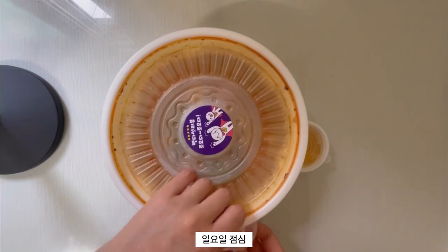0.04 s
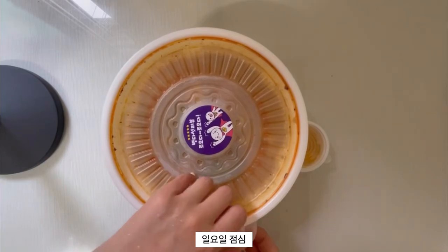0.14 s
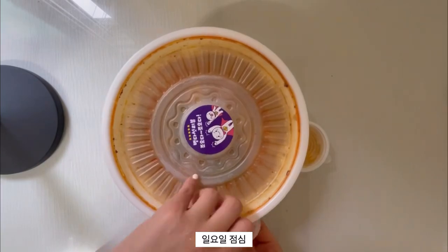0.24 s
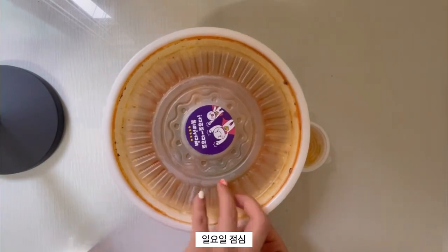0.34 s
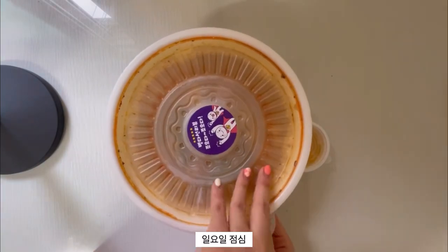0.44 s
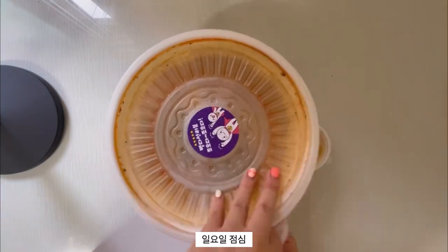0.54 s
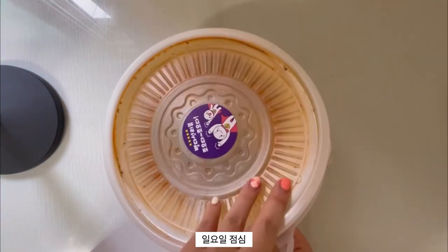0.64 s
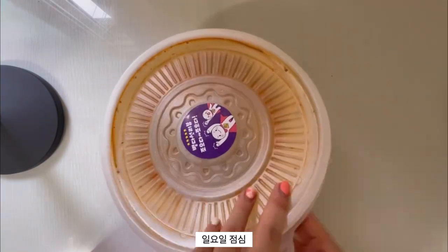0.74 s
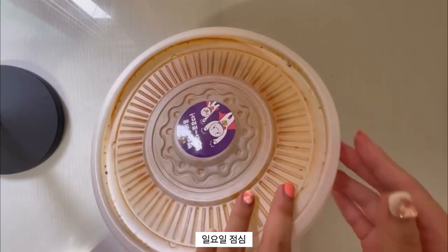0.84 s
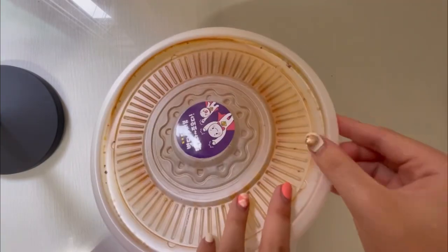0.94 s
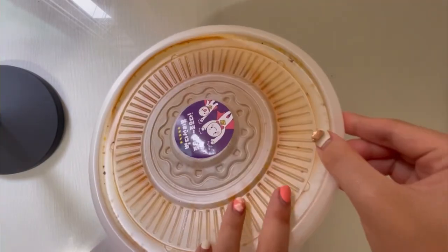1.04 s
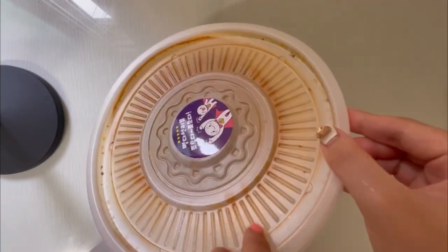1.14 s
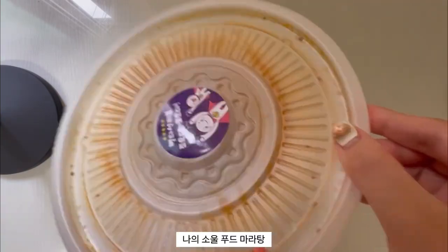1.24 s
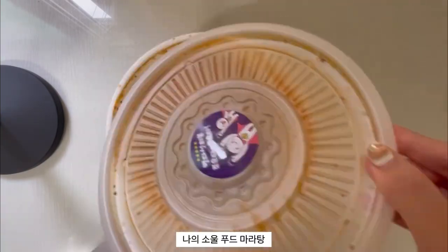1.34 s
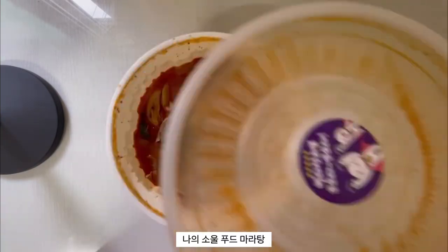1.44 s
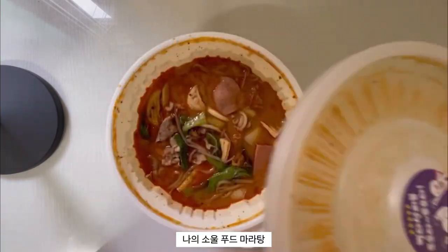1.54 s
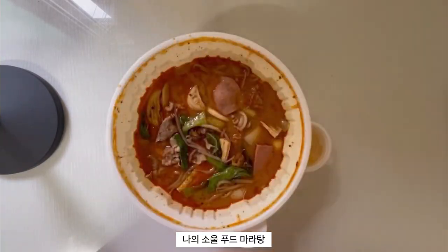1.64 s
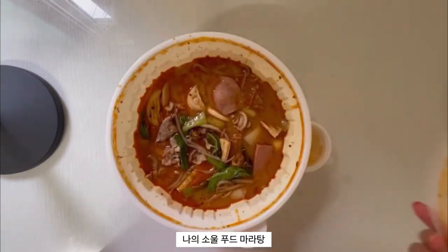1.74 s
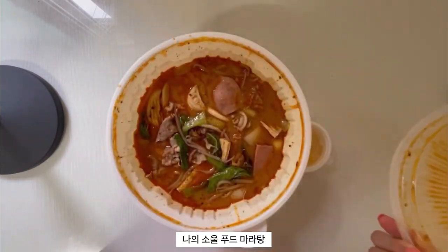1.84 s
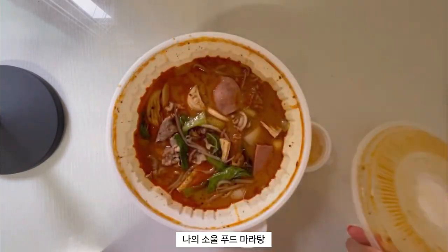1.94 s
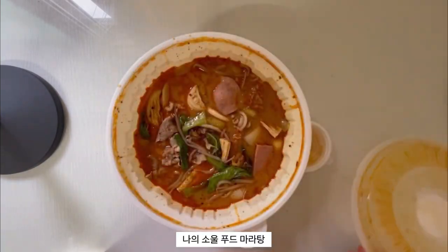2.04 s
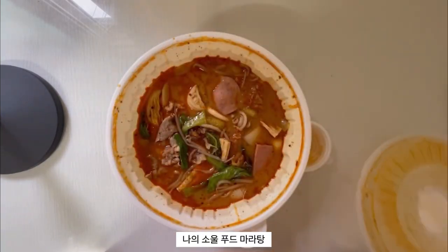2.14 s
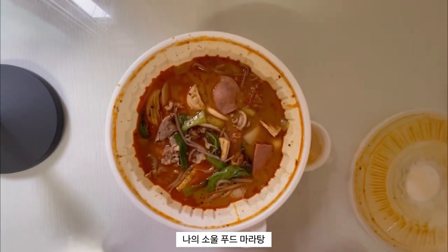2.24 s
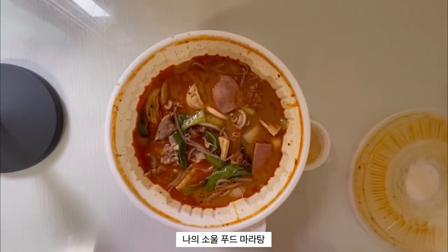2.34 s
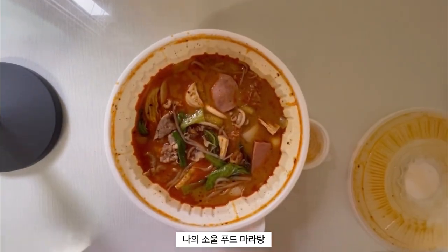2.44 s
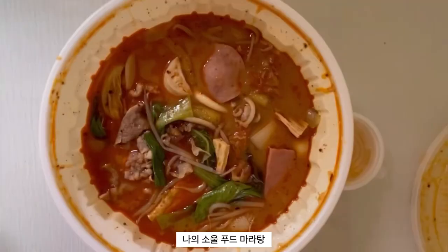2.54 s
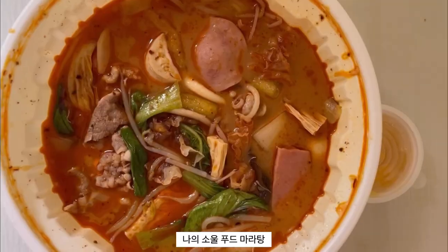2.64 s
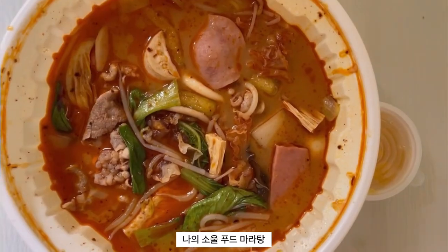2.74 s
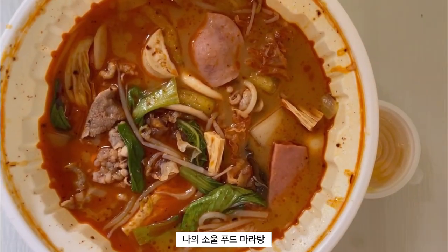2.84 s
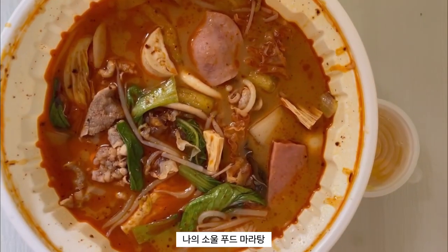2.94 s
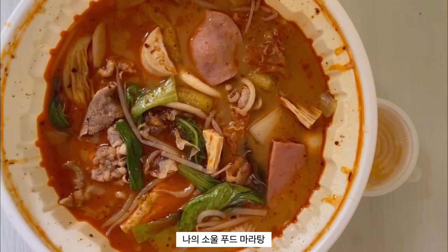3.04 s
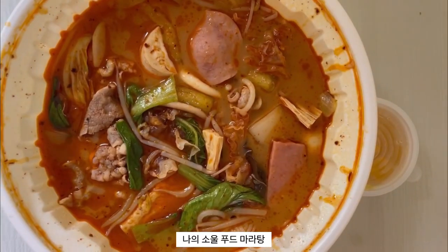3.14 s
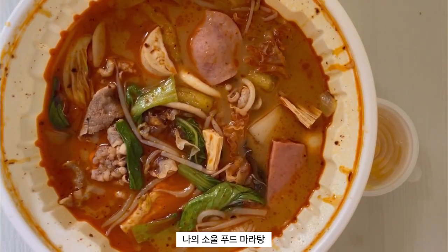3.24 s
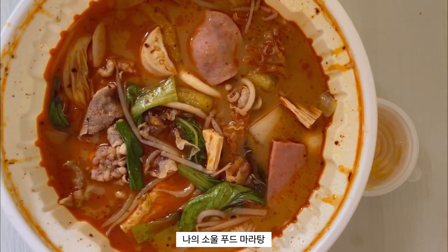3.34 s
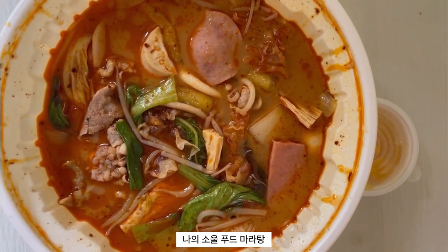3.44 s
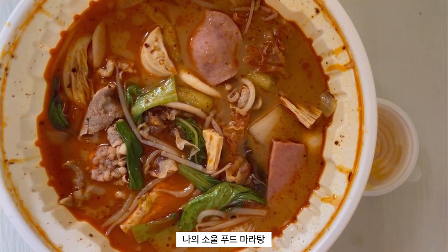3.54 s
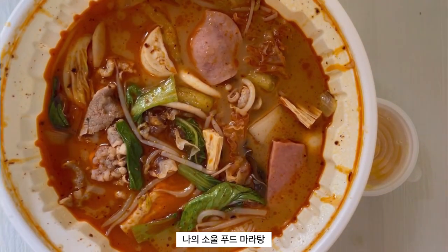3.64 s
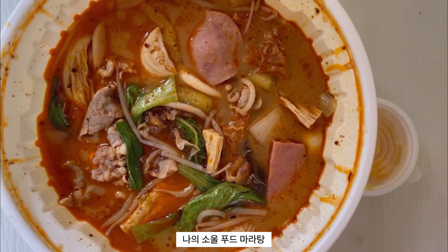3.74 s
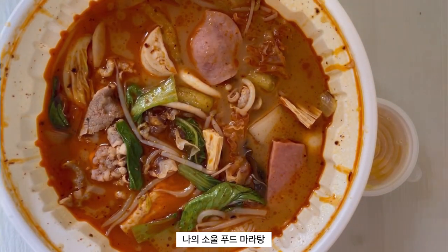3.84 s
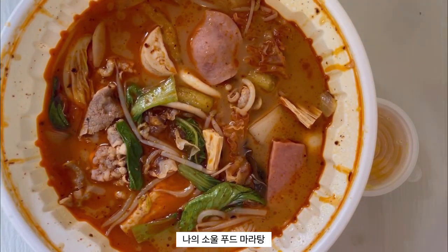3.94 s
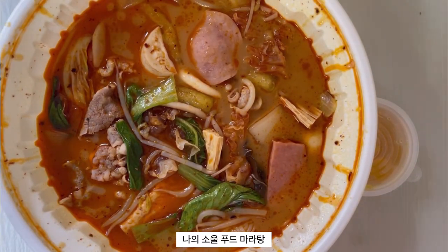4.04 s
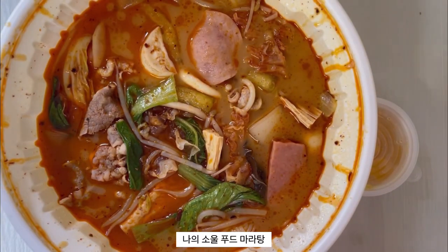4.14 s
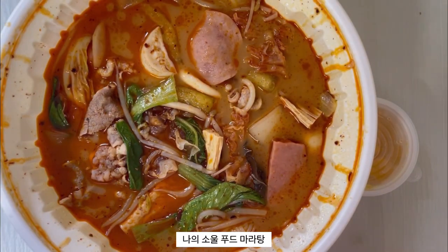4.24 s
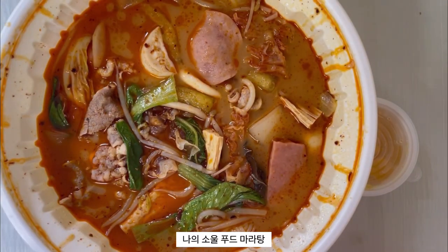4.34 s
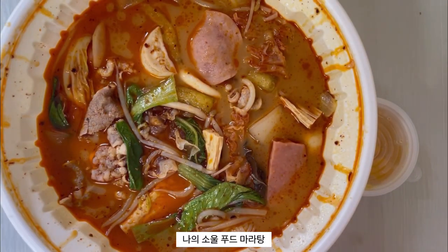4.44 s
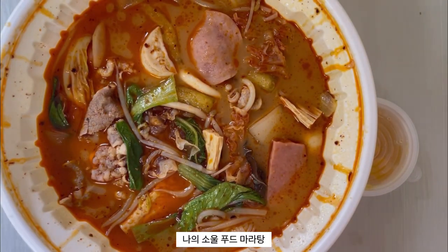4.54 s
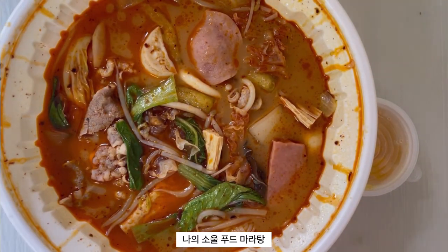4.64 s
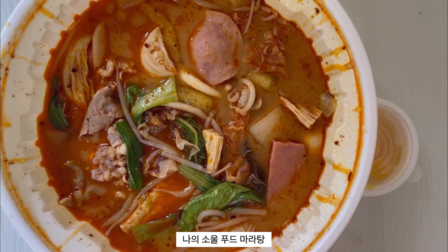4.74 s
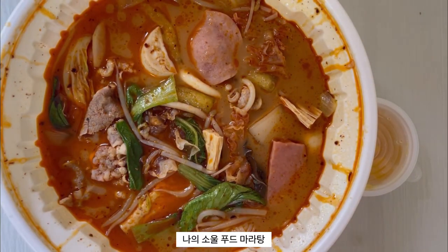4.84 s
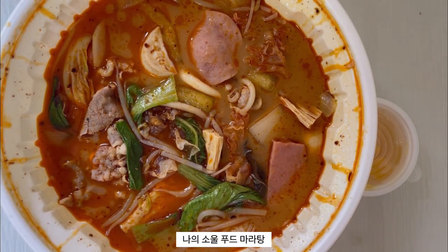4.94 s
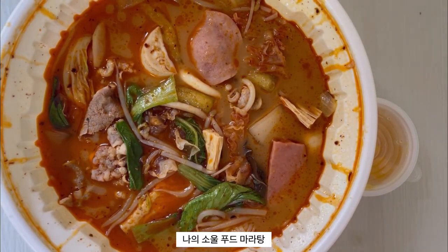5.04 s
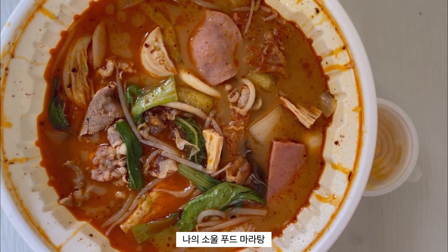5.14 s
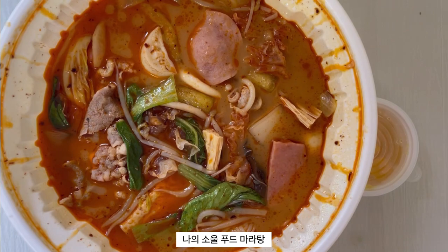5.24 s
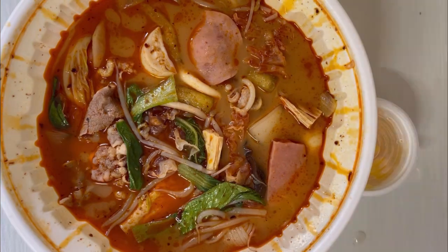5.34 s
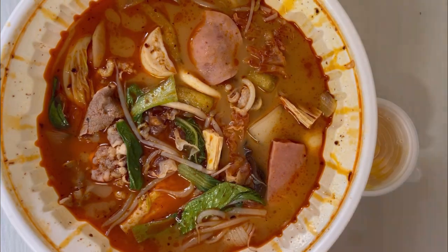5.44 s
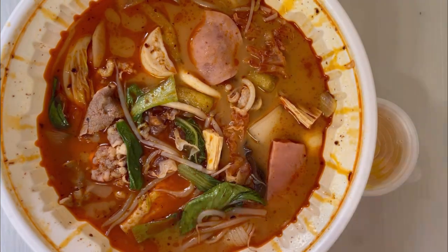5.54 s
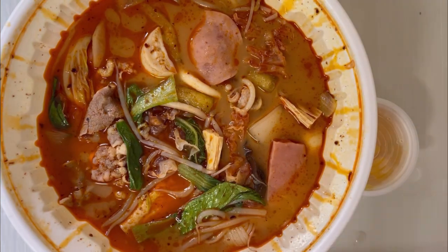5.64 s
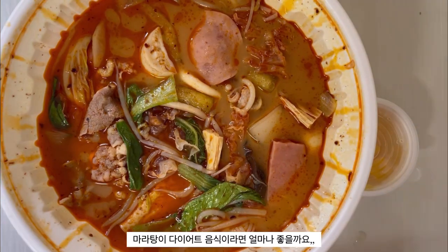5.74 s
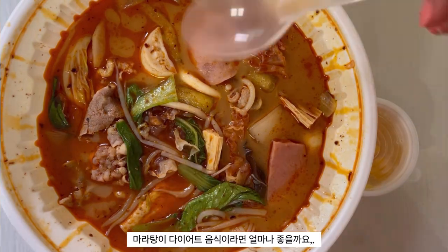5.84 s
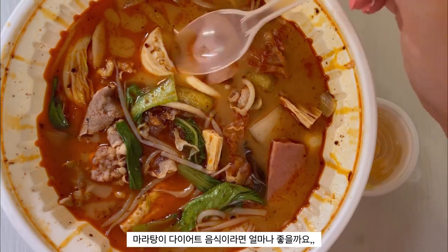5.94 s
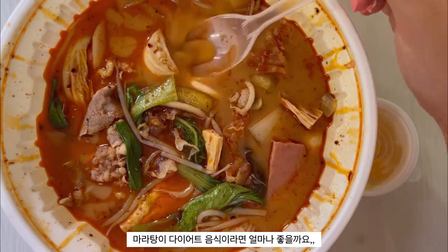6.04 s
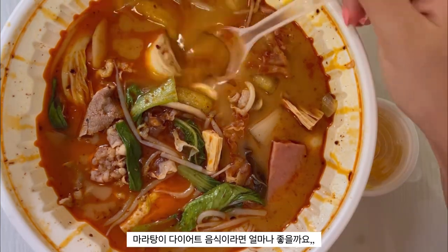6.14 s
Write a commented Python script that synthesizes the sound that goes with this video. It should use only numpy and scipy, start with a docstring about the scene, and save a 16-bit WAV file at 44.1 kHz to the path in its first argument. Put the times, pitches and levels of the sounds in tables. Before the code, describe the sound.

A thin plastic lid is squeaked, snapped and ratcheted off a tub, then clatters onto a table in a small humming room.

```python
"""In a small quiet room, close to the microphones, a thin plastic lid is pried off a soup tub on a table.
The rim ticks, squeaks, lets go and unzips: filtered clicks and stick-slip pulses ring a thin sheet.
The freed lid pops (short ringing modes) and is laid down with a clatter of clicks.
Plastic things are tapped and fingered, a sleeve rustles (shaped noise) and a spoon clicks.
An appliance hums throughout as wavering sines over shaped noise."""
import sys
import numpy as np
from scipy import signal
from scipy.fft import rfft, irfft
from scipy.io import wavfile
from scipy.ndimage import uniform_filter1d

SR = 44100
rng = np.random.default_rng(int(sys.argv[2]) if len(sys.argv) > 2 else 0)


def pcm_store(signal):
    """Save signal as 16-bit PCM."""
    levels = np.round(np.clip(np.atleast_2d(signal), -1, 1) * 32767)
    wavfile.write(sys.argv[1], SR, levels.astype(np.int16).T)


N = 272538
SIZE = 4096  # samples in a click
HZ, AGE = np.fft.rfftfreq(SIZE, 1 / SR), np.arange(SIZE) / SR
RELEASE_S = 0.5  # until the seal lets go the rim is taut

# Colours are relative; some sources add their own gain to the levels in their tables.
# single snaps as the rim slips over the lip of the tub: [t/s, level/dB, relative lift of the lows/dB]
RIM_SNAPS = [(0.0274, -35, -19.5), (0.0397, -32, -30), (0.0601, -24.5, -2.5), (0.0635, -31.5, 6),
             (0.0885, -39.5, 4), (0.1038, -36.5, -33), (0.136, -45.5, 4), (0.25, -44.5, -10.5),
             (0.2587, -39, -5), (0.2759, -36.5, 0), (0.2921, -30, -9), (0.2976, -34, 9),
             (0.3096, -31.5, -2.5), (0.339, -36, 10), (0.395, -35, 4.5), (0.423, -26.5, 2.5),
             (0.5198, -16, -25), (0.588, -31.5, 15), (0.6042, -34.5, 16.5), (0.6163, -28, 10),
             (0.6214, -27.5, 9.5), (0.6298, -27, 7), (0.631, -28.5, -11), (0.642, -32, 13),
             (0.652, -30, -3), (0.656, -30.5, 10), (0.6705, -26, 4.5), (0.721, -27, 5), (0.747, -30.5, 11),
             (0.7677, -23.5, -19), (0.7761, -19.5, -2), (0.803, -20, 2), (0.8255, -27.5, 4),
             (0.834, -32, 10), (0.8472, -27, 7.5), (0.904, -41, 1)]
# colour of the sleeve, and of a hand bump before its modes: [f/Hz, density/dB per Hz]
SLEEVE = [(53, -67), (90, -9.5), (155, 4.5), (210, 0), (488, 0), (593, -2), (977, -4), (1290, -8.5),
          (2040, -13), (3430, -21), (5530, -25.5), (16000, -36)]


def gain_of(db):
    """Decibels to amplitude."""
    return 10 ** (np.asarray(db) / 20)


def evened(x):
    """Scales to rms 1."""
    return x / np.sqrt(np.mean(x ** 2) + 1e-20)


def unit(x):
    """Scales to a mean energy of 1 a channel."""
    return evened(x) / np.sqrt(x.shape[-1])


def steadied(x, size):
    """Holds the short-time rms near 1."""
    return x / np.sqrt(abs(uniform_filter1d((x ** 2).mean(0), size)) + 1e-12)


def low_cut(x, hz, order):
    """Takes out what lies below hz."""
    return signal.sosfilt(signal.butter(order, hz, "high", fs=SR, output="sos"), x)


def read(points, hz):
    """Reads a spectrum on a log-frequency axis."""
    f, value = np.transpose(points)
    return np.interp(np.log(hz + 1), np.log(f + 1), value)


def level(rows):
    """A dB curve as a gain over the whole scene, fading quickly to silence outside its span."""
    s, db = np.transpose(rows)[:2]
    curve_db = np.interp(np.arange(N) / SR, s, db, left=-200, right=-200)
    return uniform_filter1d(gain_of(curve_db), size=130)


def strokes(rows):
    """The gain of a set of strokes: each swells to its peak and fades, evenly in dB."""
    t = np.arange(N) / SR
    depth_db = 16.5  # the change over one rise time or one fall time
    gains = []
    for s, db, rise, fall in rows:
        away = np.maximum((s - t) / rise, (t - s) / fall)
        gains.append(gain_of(db - depth_db * np.minimum(away, 10)))
    return np.linalg.norm(gains, axis=0)


def add(mix, s, sound):
    """Mixes a stereo sound in at time s."""
    part = mix[:, max(round(s * SR), 0):][:, :sound.shape[1]]
    part += sound[:, :part.shape[1]]


def resonances(modes, hz=HZ):
    """Peaks, and dips where the lift is negative, in dB."""
    return sum(db / (1 + (2 * (hz - f) / width) ** 2) for f, width, db in modes)


def body(colour, modes=(), hz=HZ):
    """A broad colour with resonances on top, in dB."""
    return read(colour, hz) + resonances(modes, hz)


def close_modes(depth_db, size):
    """The many close modes of a thin sheet, as a random ripple in dB."""
    ripple = uniform_filter1d(rng.standard_normal(len(HZ)), size=size)
    return depth_db * evened(uniform_filter1d(ripple, size=size))


def causal(db):
    """The minimum-phase response of a dB shape: it rings only after the blow."""
    log_gain = np.log(gain_of(np.maximum(db, db.max() - 100)))
    mirrored = np.r_[log_gain, log_gain[-2:0:-1]]
    return np.exp(np.conj(signal.hilbert(mirrored)))[:len(db)]


def bending(delay_s):
    """Bending waves in a thin sheet: treble arrives first, the lows lag; delay_s sets the spread."""
    delay = delay_s * np.sqrt(1300 / (HZ + 300))
    return np.exp(-2j * np.pi * np.cumsum(delay - delay.min()) * HZ[1])


def pair(apart, size, spacing_hz=1000, shadow_hz=7000, shadow=0.86):
    """Noise for two close microphones: the bass is shared, and the casing shadows the top treble."""
    shared, side = rng.standard_normal((2, size))
    side = low_cut(side, spacing_hz, order=1) + shadow * low_cut(side, shadow_hz, order=1)
    return shared + apart * np.array([side, -side])


def through(x, response):
    """Filters each channel."""
    return signal.oaconvolve(x, irfft(response)[None], axes=1)[:, :N]


def clicks(rows, shape_db, gain_db, bend_s, scuff, scuff_s, ring_db, ring_t60, apart, pan_db,
           strain=0, scuff_hz=0):
    """Each click is a sharp release, a brief scuff and a ring, spread by the sheet, coloured by its spot."""
    out = np.zeros((2, N))
    lows = read([(1300, 0.94), (2000, 0.027)], HZ)
    highs = read([(4000, 0.098), (9000, 1)], HZ)
    middle = (HZ > 1800) & (HZ < 5000)  # the level of a click is set in this band
    damping_db = -4.5 * highs  # plastic damps its treble at once, so the ring is duller than the blow
    grit = HZ / np.hypot(HZ + 1, scuff_hz)  # below scuff_hz the release is one clean push
    fade = np.minimum(1, 10 * (1 - AGE / AGE[-1])) ** 2
    pan = np.array([[pan_db], [-pan_db]]) / 2  # positive leans left
    shapes = np.broadcast_to(shape_db, (len(rows), len(HZ)))  # one for all, or one each
    for (s, db, low_db, high_db, *_), shape in zip(rows, shapes):
        rasp = unit(pair(apart, SIZE) * np.sqrt(AGE) * np.exp(-AGE / scuff_s))
        force = np.sqrt(1 + scuff ** 2 * (1 - grit ** 2)) + scuff * grit * rfft(rasp)
        ring = unit(pair(apart, SIZE) * gain_of(-60 * AGE / ring_t60))
        drive = force + gain_of(ring_db + damping_db) * rfft(ring)
        # bending the sheet shifts its resonances, and every spot has its own path to the edge
        bent_db = np.interp(HZ * (1 + strain * rng.uniform(-1.4, 1)), HZ, shape)
        response = causal(bent_db + .8 * low_db * lows + high_db * highs)
        z = drive * response * bending(bend_s * rng.uniform(.5, 1))
        click = fade * irfft(z) / np.linalg.norm(irfft(z * middle).mean(0))
        add(out, s, click * gain_of(gain_db + db + pan))
    return out


def crackle(envelope, shape_db, gain_db, per_s, size_db, bend_s, apart):
    """A dense train of tiny slips of random size and sign into the sheet."""
    slips = (rng.random(N) < per_s / SR) * rng.choice([-1, 1], N)
    slips = slips * gain_of(size_db * rng.standard_normal(N))
    side = apart * low_cut(slips * rng.standard_normal(N), 1200, order=1)
    sound = through(np.array([slips + side, slips - side]), causal(shape_db) * bending(bend_s))
    return gain_of(gain_db) * steadied(sound, size=1100) * envelope


def rub(colour, grain_db, grain_size, apart):
    """Friction noise of rms 1 that comes in small clumps."""
    clumps = gain_of(grain_db * evened(uniform_filter1d(rng.standard_normal(N), size=grain_size)))
    return evened(through(pair(apart, N) * clumps, causal(body(colour))))


def room_tone(waver=1.0):
    """Fan-like air with a low drone, and appliance hum lines whose phases waver a little."""
    # colour of the air: [f/Hz, density/dB per Hz]
    air_colour = [(18, -87.5), (30, -60), (103, -28.5), (124, -15), (174, -5.5), (204, -15), (426, -15),
                  (461, -26), (512, -9.5), (569, -19.5), (702, -13.5), (913, -24.5), (1130, -28),
                  (2230, -34.5), (16000, -56.5)]
    # resonances in the air: [f/Hz, width/Hz, lift/dB]
    air_modes = [(142.9, 30, 11), (730, 460, 1.94), (2756, 300, 2.5), (5000, 110, 8.6)]
    # likeness of left and right: [f/Hz, likeness 0-1]
    air_same = [(60, 0.97), (180, 1), (550, 0.85), (1650, 0.031), (4970, 0.29), (15000, 0.02)]
    # appliance hum: [f/Hz, rms level/dB]
    hum_lines = [(177.6, -62.5), (285.3, -76.5), (527.6, -79.5), (699.8, -75), (893.6, -79)]
    air_db = -62.5  # rms of both channels above 200 Hz sets the reference
    hz, t = np.fft.rfftfreq(N, 1 / SR), np.arange(N) / SR
    a, b = rfft(rng.standard_normal((2, N)))
    same = np.clip(read(air_same, hz), 0, 1)
    z = np.array([a, same * a + np.sqrt(1 - same ** 2) * b]) * gain_of(body(air_colour, air_modes, hz))
    out = gain_of(air_db) * irfft(z, N) / np.std(irfft(z * (hz > 200), N))
    knots = np.linspace(0, t[-1], num=40)
    for f, db in hum_lines:
        drift = waver * np.interp(t, knots, rng.standard_normal(len(knots)))
        out += gain_of(db) * np.sqrt(2) * np.sin(2 * np.pi * (f * t + rng.random()) + drift)
    return out


def rim_creep(seated):
    """The seated rim creeps under the fingers as a dense crackle of tiny slips."""
    # swells of the creeping: [peak t/s, level/dB, rise/s, fall/s]
    creep = [(0.055, -44.5, 0.043, 0.02), (0.105, -49, 0.021, 0.12), (0.246, -46.5, 0.015, .05),
             (0.295, -40.5, 0.038, 0.046)]
    # creeping has thinner upper mids and a little more top treble than snapping: [f/Hz, lift/dB]
    tilt = [(1000, -2), (4000, -4.5), (12000, 2)]
    return crackle(strokes(creep), seated + read(tilt, HZ), gain_db=-1.5, per_s=3300, size_db=3.0,
                   bend_s=0.0017, apart=0.56)


def taut_snaps(seated):
    """While the rim is clamped on the tub it snaps sharply and brightly, its lightest ticks most of all."""
    middling_db, high_lift_db = -34.5, 10.5
    brightening = .6  # extra dB of highs for each dB under a middling snap
    snaps = [(s, db, low_db, high_lift_db + brightening * (middling_db - db))
             for s, db, low_db in RIM_SNAPS if s < RELEASE_S]
    return clicks(snaps, seated, gain_db=17.0, bend_s=0.0012, scuff=1.0, scuff_s=0.0018, ring_db=-5.5,
                  ring_t60=0.05, apart=0.45, pan_db=2.0, strain=0.03)


def thumps(rise_s=0.0016, lowest_hz=125):
    """Each flex swells in a moment and dies as one ringing mode, mostly low.

    A low cut like the recorder's keeps out the deep bass."""
    # a wall flexes and rings hollow: [t/s, level/dB before swell and low cut, f/Hz, t60/s]
    flexes = [(0.061, -24.5, 666, 0.025), (0.293, -30.5, 853, 0.086), (0.527, -13.5, 593, .025),
              (0.531, -21, 998, 0.11), (0.534, -27, 2343, .12), (0.806, -31.5, 1049, 0.13),
              (1.237, -13.5, 182, 0.037), (1.236, -30.5, 388, 0.038), (1.970, -34.5, 433.6, 0.1),
              (2.196, -25.5, 610, 0.025), (2.226, -35, 420.6, 0.14), (4.224, -37.5, 700, 0.21),
              (4.2239, -28.5, 427, 0.043), (4.443, -32.5, 1074, 0.073), (5.494, -33, 470, 0.043),
              (5.514, -38, 151, 0.15), (5.574, -36, 383, .045)]
    out, t = np.zeros((2, N)), np.arange(SR // 2) / SR
    for s, db, hz, t60 in flexes:
        ring = gain_of(db - 60 * t / t60) * (1 - np.exp(-t / rise_s)) * np.sin(2 * np.pi * hz * t)
        add(out, s, np.array([ring, ring]))
    return low_cut(out, lowest_hz, order=4)


def squeaks(scuff=.9, apart=.17, jitter=.05):
    """Nearly regular stick-slip pulses, each with its own scuff, ring the rim and race as it lets go."""
    # the rim sticks and slips, one table a squeak: [t/s, level/dB, mean slips a second]
    squeak_tables = [
        [(0.448, -43, 500), (0.451, -42, 360), (0.463, -40, 1040), (0.471, -43.5, 810)],
        [(0.486, -41.5, 635), (0.497, -32, 750), (0.506, -24.5, 580), (0.512, -22, 520), (0.519, -21.5, 680),
         (0.5217, -14, 1820), (0.524, -25, 2400)],
    ]
    # colour of the squeaking rim: [f/Hz, density/dB per Hz]
    squeal = [(240, -66), (400, -38.5), (504, -21), (801, -23), (1070, -4), (1290, -17.5), (1530, -7.5),
              (2800, -9), (3260, -4.5), (5960, -13.5), (7750, -13.5), (11900, -34), (16000, -45)]
    response = causal(body(squeal, [(3580, 550, 5.2), (1000, 140, 4.8)]))
    out, t = np.zeros((2, N)), np.arange(N) / SR
    for rows in squeak_tables:
        s, _, rate = np.transpose(rows)
        uneven = 1 + jitter * evened(uniform_filter1d(rng.standard_normal(N), size=80))
        turns = np.cumsum(np.interp(t, s, rate) * uneven) / SR
        pulses = evened(np.diff(np.floor(turns), prepend=0))
        force = pulses + scuff * evened(pair(apart, N) * np.exp(-(turns % 1) / 0.39))
        out += level(rows) * steadied(through(force, response), size=170)
    return out


def loose_snaps(rim):
    """Once the seal has let go the snaps are duller."""
    snaps = [(s, db, low_db, -0.5) for s, db, low_db in RIM_SNAPS if s >= RELEASE_S]
    return clicks(snaps, rim, gain_db=17.0, bend_s=0.004, scuff=1.3, scuff_s=0.0012, ring_db=-5.5,
                  ring_t60=0.038, apart=0.35, pan_db=2.5, strain=0.022, scuff_hz=2200)


def unzipping(rim, count=8, unevenness=0.53, spread_db=3.5, high_db=-2):
    """The rim unzips along the lip: each run is a handful of slips, uneven in time and size."""
    # one row a run: [start t/s, end t/s, level of a slip/dB, relative lift of lows/dB, lift of mids/dB]
    runs = [(0.533, 0.555, -25, -2.5, 9), (0.556, 0.579, -28.5, 0, 2), (0.581, 0.597, -31.5, 2, 4),
            (0.618, 0.66, -33.5, 5.5, -2.5), (0.782, 0.799, -31, -2.5, -1), (0.801, 0.823, -30.5, 2, 0)]
    slips, colours = [], []
    for start, end, db, low_db, mid_db in runs:
        uneven_s = unevenness * (end - start) / count * rng.uniform(-1, 1, count)
        times = np.linspace(start, end, count) + uneven_s
        sizes = rng.uniform(-0.74, 1, count)
        slips += [(s, db + spread_db * size, low_db, high_db) for s, size in zip(times, sizes)]
        # the mids swell while the rim is bent farthest
        colours += [rim + resonances([(1800, 830, mid_db)])] * count
    return clicks(slips, np.array(colours), gain_db=18.5, bend_s=0.0027, scuff=2.1, scuff_s=0.001,
                  ring_db=-10, ring_t60=0.023, apart=0.4, pan_db=2.5, strain=0.073, scuff_hz=1513)


def dome_cracks(lid):
    """The dome of the lid buckles with a dry crack."""
    # buckling of the dome: [t/s, level/dB]
    buckles = [(0.6034, -20), (0.839, -28)]
    return clicks([(s, db, 0, 0) for s, db in buckles], lid, gain_db=16.5, bend_s=0.002, scuff=.5,
                  scuff_s=0.0012, ring_db=-10, ring_t60=0.11, apart=0.35, pan_db=2)


def edge_scraping(lid):
    """Between catches the edge scrapes softly over the lip, a crackle of tiny slips."""
    # one row a pull: [start t/s, end t/s, level/dB]
    pulls = [(0.968, 1.028, -42.5), (1.049, 1.094, -42), (1.133, 1.23, -41.5)]
    envelope = sum(level([(start, db), (end, db)]) for start, end, db in pulls)
    return crackle(envelope, lid, gain_db=1, per_s=780, size_db=9.0, bend_s=0.003213, apart=0.73)


def edge_catches(lid):
    """The half-free lid catches on the lip again and again in three pulls, then its edge flicks off."""
    # catches on the lip: [t/s, level/dB, relative lift of the lows/dB]
    catch_rows = [(0.9706, -25, 2), (0.977, -40, 13), (0.9841, -28, -1.5), (0.989, -26.5, 1),
                  (1.002, -24, -2), (1.009, -35, 8), (1.0177, -30, 3.5), (1.0304, -33.5, 10),
                  (1.052, -26.5, 4), (1.065, -44, 5), (1.0722, -32.5, 7), (1.0879, -25, -3),
                  (1.1015, -30.5, 0), (1.1368, -27.5, -0.5), (1.1417, -34.5, -6), (1.1571, -24, -1.5),
                  (1.1688, -32, -5), (1.182, -25.5, 1.5), (1.1925, -34, 6), (1.2012, -24, 4),
                  (1.2138, -30.5, 3), (1.2281, -27.5, 6)]
    # the edge flicks free: [t/s, level/dB, relative lift of the lows/dB, of the highs/dB]
    flicks = [(1.2308, -31, -14, 22.5), (1.237, -30, -3, 18.5)]
    catches = [(s, db, low_db, 5) for s, db, low_db in catch_rows]
    return clicks(catches + flicks, lid, gain_db=16.5, bend_s=0.00439, scuff=1.74, scuff_s=0.001,
                  ring_db=2, ring_t60=0.016, apart=0.3, pan_db=2.5, strain=0.028, scuff_hz=3980)


def lid_sounds():
    """The lid in the hands ratchets off the tub; a low cut keeps the clicks free of rumble."""
    # colours of the rim and of the whole lid: [f/Hz, density/dB per Hz]
    rim_colour = [(71, -42.5), (120, -16), (147, -12.5), (278, -12), (418, -6), (483, -13), (569, -9.5),
                  (712, -3.5), (1120, -1.5), (1860, -7.5), (2290, -7), (2590, -4.5), (3450, -6.5),
                  (4410, -13), (16000, -36)]
    lid_colour = [(71, -18), (120, -3.5), (209, 2), (284, -11.5), (643, -2), (805, -1.5), (988, -2.5),
                  (1190, -2), (1400, -6.5), (1940, -6), (2990, 1.5), (4980, -13), (6500, -16.5),
                  (7660, -24.5), (16000, -35)]
    # their resonances and the gaps between them: [f/Hz, width/Hz, lift/dB]
    rim_modes = [(430.4, 40, 3.5), (640, 120, -5.5), (821, 220, -8.5), (1014, 37, 6), (1057, 130, 6),
                 (1680, 650, -3.5), (2290, 110, 6.5), (2940, 120, 3), (3596, 450, 4)]
    lid_modes = [(587, 220, 7.5), (793, 89, -10), (993, 61, 8.5), (1162, 112, 7.5), (1960, 200, -4),
                 (3220, 740, 3.5)]
    # clamped on the tub the rim rings lower: [f/Hz, width/Hz, lift/dB]
    seated_modes = [(311.3, 31, 4.5), (705, 84, 11), (862.7, 140, 10), (1155, 180, -14), (1650, 200, 7.5),
                    (15000, 2700, 4)]
    # the lean of the lid across the stereo pair: [f/Hz, left-right/dB]
    balance = [(700, -1.5), (1300, 1), (2400, .5), (4400, -4.5), (8000, -3.5), (15000, -2.5)]
    rim = body(rim_colour, rim_modes) + close_modes(depth_db=3.5, size=5)
    seated = body(rim_colour, rim_modes + seated_modes)
    lid = body(lid_colour, lid_modes) + close_modes(depth_db=1.0, size=5)
    out = rim_creep(seated) + taut_snaps(seated) + squeaks()
    out += loose_snaps(rim) + unzipping(rim) + dome_cracks(lid)
    out += edge_scraping(lid) + edge_catches(lid)
    out = low_cut(out, 54, order=2)
    # the lid throws its treble to the right
    lean_db = read(balance, np.fft.rfftfreq(N, 1 / SR)) / 2
    return irfft(rfft(out) * gain_of([lean_db, -lean_db]), N)


def finger_ticks():
    """Light ticks on plastic: a firm one is all nail, a lighter one has more soft pad, so more lows."""
    # ticks of the fingers: [t/s, level/dB, relative lift of the highs/dB]
    tick_rows = [(1.46, -53.5, 25.5), (1.651, -62, 13), (1.722, -63.5, 16.5), (2.462, -59, -27.5),
                 (2.552, -57, -20.5), (2.651, -67, 16), (3.363, -62.5, 9.5), (3.715, -48, -35.5),
                 (3.787, -43.5, 8.5), (5.2894, -51, 4)]
    # a fingernail: [f/Hz, density/dB per Hz]
    nail = [(470, -30), (800, -24), (1950, -6), (2410, 5.5), (3560, -10), (4400, -8.5), (4990, -2.5),
            (7640, -17), (12100, -21), (16000, -28)]
    nail_db, pad_slope, pad_most_db = -48.5, 2.8, 19
    ticks = [(s, db, np.clip(pad_slope * (nail_db - db), -pad_most_db, pad_most_db), high_db)
             for s, db, high_db in tick_rows]
    return clicks(ticks, body(nail), gain_db=16.0, bend_s=0.00024, scuff=4.4, scuff_s=0.0012,
                  ring_db=11.0, ring_t60=0.098, apart=0.54, pan_db=-0.5)


def finger_slides():
    """Fingers slide on plastic: the hiss of tiny grips and the dull scuff of the pad."""
    # slides of the fingers: [peak t/s, level/dB, rise/s, fall/s]
    slides = [(1.475, -64.5, 0.029, 0.033), (2.078, -63.5, 0.065, .06), (2.11, -62.5, 0.018, 0.029),
              (3.515, -56, 0.025, 0.048), (3.588, -63.5, .02, 0.055), (3.632, -52.5, 0.032, 0.023),
              (3.682, -59.5, 0.02, 0.048), (4.41, -57, 0.021, 0.043)]
    # a finger on plastic: [f/Hz, density/dB per Hz]
    skin = [(900, -16), (1700, -9.5), (2450, 0.5), (3400, -13), (6000, -14), (10000, -13.5), (13000, -7.5),
            (16000, -44)]
    # the scuff of a finger pad: [f/Hz, density/dB per Hz]
    pad = [(150, -12), (430, -2.5), (800, -2.5), (1400, -5), (2200, -16.5), (4000, -19.5), (16000, -37)]
    hiss = rub(skin, grain_db=6.5, grain_size=260, apart=0.39)
    dull_scuff = gain_of(0.5) * rub(pad, grain_db=6.5, grain_size=300, apart=0.45)
    return strokes(slides) * (hiss + dull_scuff)


def lid_laid_down():
    """The edge touches the table, then the lid drops and clatters flat, each blow ringing the dome."""
    # blows: [t/s, level/dB, relative lift of lows/dB, of highs/dB, dome ring f/Hz before a random shift]
    blows = [(1.9693, -33.5, 0.5, 22, 2470), (2.0037, -42.5, 7, -3.5, 2710),
             (2.1653, -50, 18.5, 25.5, 2650), (2.193, -25.5, -5.5, 7, 2800), (2.1954, -19.5, -1.5, 8, 2790),
             (2.2009, -27, 7, 8, 2410), (2.2049, -19, -5, -7.5, 2450), (2.2075, -26, -1.5, 5.5, 2400),
             (2.2153, -25, 7.5, 6, 2390), (2.219, -30.5, -2, -2.5, 2510), (2.225, -25, 2, 3.5, 2410),
             (2.2303, -32.5, -7.5, 3.5, 2380), (2.2409, -33.5, -5.5, -3, 2390)]
    # colour of lid on table: [f/Hz, density/dB per Hz]
    table_colour = [(88, -34.5), (150, -19.5), (244, -18), (431, -5), (720, -5.5), (860, -14), (1150, -2),
                    (1630, -13.5), (2360, -6), (2950, -10), (3420, -17.5), (4300, -9.5), (6140, -18),
                    (6910, -23.5), (12900, -28), (16000, -34)]
    # resonances and gaps of lid on table: [f/Hz, width/Hz, lift/dB]
    table_modes = [(1590, 250, -8), (2040, 150, 3), (3270, 450, -9.5)]
    dome = [body(table_colour, table_modes + [(hz, 610, 10)]) for *_, hz in blows]
    return clicks(blows, dome, gain_db=18.0, bend_s=.0015, scuff=1.13, scuff_s=0.0027, ring_db=2.5,
                  ring_t60=0.12, apart=0.54, pan_db=0.5, strain=0.053, scuff_hz=1200)


def hand_bumps():
    """Soft bumps of the hand; the table and tub answer with a hollow note."""
    # bumps against the table: [t/s, level/dB]
    bump_rows = [(3.311, -57.5), (3.788, -54.5), (3.364, -57.5), (5.441, -54.5), (5.484, -43.5),
                 (5.495, -41), (5.524, -49), (5.556, -42.5), (5.574, -41.5), (5.586, -42.5), (5.637, -47)]
    # the hollow answer: [f/Hz, width/Hz, lift/dB]
    bump_modes = [(448, 110, 6), (651, 140, -5), (1273, 140, -8.5), (1770, 1300, 4.5)]
    bumps = [(s, db, 3, 1.5) for s, db in bump_rows]
    return clicks(bumps, body(SLEEVE, bump_modes), gain_db=15.5, bend_s=0.000945, scuff=1.7,
                  scuff_s=0.0071, ring_db=0.0, ring_t60=0.59, apart=0.3, pan_db=-3.5, strain=0.018)


def cloth_swishes():
    """Cloth swishes softly with the arm, as bright noise in strokes."""
    # swishes: [peak t/s, level/dB, rise/s, fall/s]
    swishes = [(3.972, -64.5, 0.014, 0.044), (4.85, -73, 0.17, 0.079), (5.015, -67.5, 0.028, 0.047),
               (5.27, -72, 0.17, 0.19), (5.65, -72, 0.4, 0.17), (5.94, -70, 0.092, 0.056)]
    # swishing cloth: [f/Hz, density/dB per Hz]
    cloth = [(2000, -3), (4500, -8.5), (7500, -1.5), (12000, -5.5), (16000, -8)]
    return gain_of(4.0) * strokes(swishes) * rub(cloth, grain_db=0.3, grain_size=200, apart=0.41)


def hard_taps():
    """Something small of hard plastic is knocked and put down; it rings lower as it is pressed down."""
    # taps: [t/s, level/dB, relative lift of lows/dB, of highs/dB, ring f/Hz before a random shift]
    taps = [(4.2223, -28.5, 10, 13, 2770), (4.2461, -38, 7, 15.5, 2550), (4.433, -21, -28, -6, 2740),
            (4.4345, -24, -7, 5, 2670), (4.4431, -25, 7.5, 11.5, 2250), (4.4535, -30, 5, -15, 2140)]
    # the small hard thing: [f/Hz, density/dB per Hz]
    knock_colour = [(88, -42), (150, -26.5), (303, -10.5), (398, 1), (566, -6), (702, -2.5), (774, 0.5),
                    (1100, -11), (1600, -10), (2180, -2.5), (3490, -9.5), (5790, -12), (11500, -26.5),
                    (16000, -27)]
    # its resonances: [f/Hz, width/Hz, lift/dB]
    knock_modes = [(1080, 176, 4), (1630, 560, -8.5), (3375, 270, -18), (6000, 370, 3), (12180, 820, 9)]
    knock = [body(knock_colour, knock_modes + [(hz, 550, 13)]) for *_, hz in taps]
    # it lies to the left
    return clicks(taps, knock, gain_db=17.5, bend_s=0.0018, scuff=2.3, scuff_s=0.002, ring_db=-0.5,
                  ring_t60=0.11, apart=0.43, pan_db=4.5, strain=0.013, scuff_hz=2000)


def sleeve_drags():
    """A sleeve drags as the arm reaches over, as dull clumped noise."""
    # drags: [peak t/s, level/dB, rise/s, fall/s]
    reaches = [(5.25, -55.5, 0.068, 0.48), (5.5, -44.5, 0.065, 0.1), (5.58, -46, 0.11, 0.088),
               (5.7, -57.5, 0.35, 1.9)]
    return strokes(reaches) * rub(SLEEVE, grain_db=2.5, grain_size=500, apart=0.51)


def hand_scrapes():
    """The hand scrapes crisply over the table, as smooth bright noise."""
    # scrapes: [peak t/s, level/dB, rise/s, fall/s]
    scrapes = [(5.485, -47.5, 0.013, 0.047), (5.507, -63, 0.022, 0.07), (5.58, -51.5, 0.072, 0.06)]
    # colour of scraping: [f/Hz, density/dB per Hz]
    scraping = [(2500, -28.5), (4000, -9), (4800, -3), (5800, -2), (7500, -10), (9500, -11.5),
                (11500, -13.5), (16000, -18)]
    return strokes(scrapes) * rub(scraping, grain_db=0.0, grain_size=120, apart=0.3)


def spoon_clicks():
    """A plastic spoon clicks as it is picked up, mostly scuff and little ring."""
    # clicks: [t/s, level/dB, relative lift of the lows/dB, of the highs/dB]
    spoon_rows = [(6.0636, -42.5, 6.5, -3.5)]
    # the spoon: [f/Hz, density/dB per Hz]
    spoon = [(300, -21.5), (1300, -24), (2200, -13), (2800, -2), (3400, 1), (4200, -10), (5000, -2.5),
             (6800, -23.5), (10000, -19), (16000, -23)]
    return clicks(spoon_rows, body(spoon), gain_db=20, bend_s=0.00033, scuff=8.1, scuff_s=0.00097,
                  ring_db=-18, ring_t60=0.028, apart=0.14, pan_db=-0.5)


def room(x, first_s=0.0086, apart=.67):
    """A short diffuse tail that builds up over first_s, each band dying at its own speed."""
    # decay of the room: [f/Hz, t60/s]
    decay = [(200, 0.16), (700, 0.15), (2500, 0.093), (6000, 0.12), (14000, 0.095)]
    hz, t, z = signal.stft(pair(apart, SR // 3), SR, nperseg=256)
    tail = signal.istft(z * gain_of(-60 * t / read(decay, hz)[:, None]), SR, nperseg=256)[1]
    tail *= 1 - np.exp(-(np.arange(tail.shape[1]) / SR / first_s) ** 2)
    return signal.oaconvolve(x, unit(tail), axes=1)[:, :N]


def scene():
    """The lid is close and dry; things on the table lie farther off and carry more room."""
    near = lid_sounds() + thumps()
    far = finger_ticks() + lid_laid_down() + hand_bumps() + hard_taps() + spoon_clicks()
    rubbing = finger_slides() + cloth_swishes() + sleeve_drags() + hand_scrapes()
    echoes = room(gain_of(-13.5) * near + gain_of(-12.0) * far)
    return room_tone() + near + far + echoes + rubbing


def record(dry):
    """The recorder's band limit, a low-pass at 16.3 kHz."""
    low_pass = signal.firwin(255, 16300, window=("kaiser", 9), fs=SR)
    return signal.oaconvolve(dry, low_pass[None], "same")


dry = scene()
out = record(dry)
pcm_store(out)
```